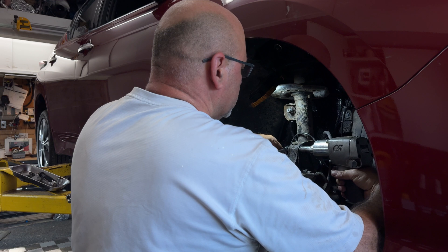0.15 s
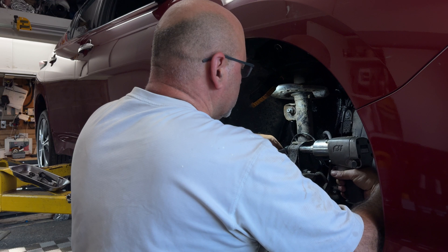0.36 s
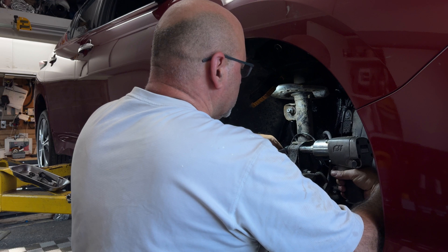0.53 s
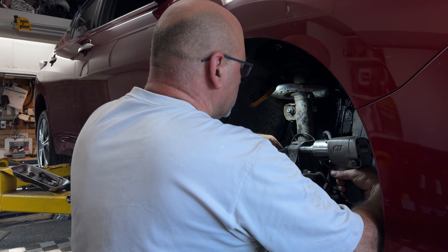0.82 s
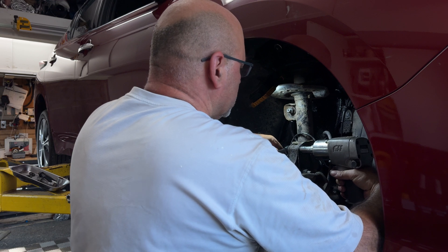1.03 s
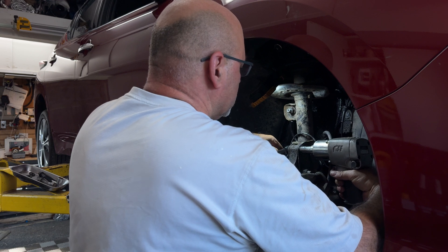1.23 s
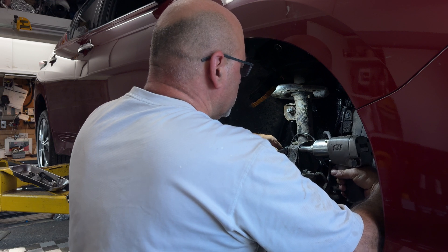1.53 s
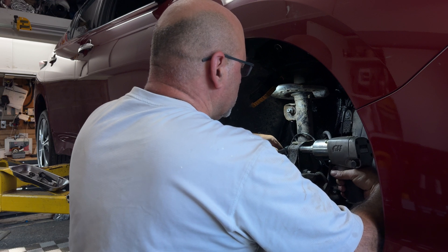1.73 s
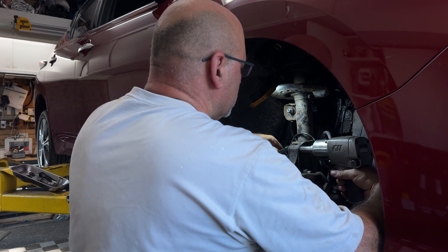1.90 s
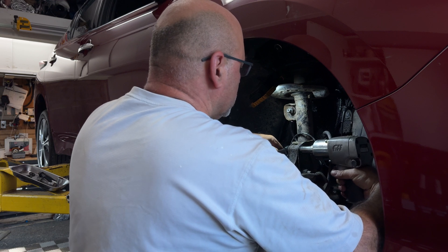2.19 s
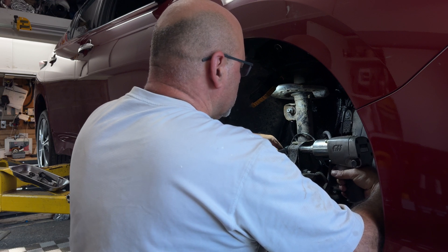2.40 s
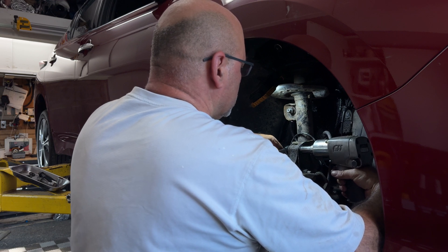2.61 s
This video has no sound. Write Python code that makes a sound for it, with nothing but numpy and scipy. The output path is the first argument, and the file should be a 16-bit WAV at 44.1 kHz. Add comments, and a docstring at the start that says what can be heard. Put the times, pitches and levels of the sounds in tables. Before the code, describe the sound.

A pneumatic impact wrench hammers a suspension nut, heard close. From the start to 1.0 s, steady heavy clanging blows, about eleven per second, with socket clatter, thumping exhaust puffs and air hiss; the motor flutters down. A clink sounds at 1.2 s. A faster, uneven burst runs 1.35-1.95 s, pauses, then a still quicker, brighter one at 2.15-2.67 s. Hollow wheel-arch boom, short garage reverberation, faint background noise.

```python
"""Three short bursts of hard, ringing hammering: a pneumatic impact wrench on a car's suspension nut, in a garage.
In each cycle the air motor gives a thump and quickening exhaust puffs, then stalls as the hammer strikes the anvil.
Between blows the hammer and loose socket clatter; air hisses under each burst, and clinks fall between two.
Blows and contacts are shaped noise plus decaying sines, puffs are filtered pulses. At the microphone the
direct sound comes with near reflections, the boom of the wheel arch, a short room tail and a faint floor."""
import sys
import numpy as np
from scipy import signal
from scipy.io import wavfile
from scipy.ndimage import uniform_filter1d

SR = 44100
rng = np.random.default_rng(int(sys.argv[2]) if len(sys.argv) > 2 else 0)


def store_wav(level_fs):
    """Save 16-bit WAV to argv[1]."""
    pcm = np.round(np.clip(np.atleast_2d(level_fs), -1, 1) * 32767)
    wavfile.write(sys.argv[1], SR, pcm.T.astype(np.int16))


N = 121275

# Event levels are relative to the base level of their layer.
# Hammer blows: (time [s], level [dB], treble [dB], clang pitch [Hz], clang level [dB])
BLOWS = [(.0863,1,-19.5,3270,-8.5), (.18,-1,-21,4310,-13), (0.2727,-4,-14.5,3460,-5),
         (0.3626,1,-16,4280,-12), (0.4532,1,-21.5,3590,-10.5), (.546,-2,-16.5,3260,-12),
         (.637,0.5,-17.5,3600,-13), (.7294,3,-22,4370,-15), (0.8231,0.5,-17,4820,-8),
         (0.9197,1,-17.5,4010,-7.5), (1.0133,2,-21.5,3820,-13), (1.3774,-2.5,-17,3840,-10),
         (1.4124,-4.5,-12.5,4690,-8.5), (1.473,-1.5,-18,4650,-14), (1.5425,-5.5,-10.5,4640,-11.5),
         (1.6254,-2.5,-15.5,3200,-13), (1.706,-5,-8,9700,-12), (1.7883,-4.5,-15.5,5660,-14),
         (1.8707,-5.5,-10,3820,-14), (1.9646,-4.5,-12,2975,-11), (2.1939,-5.5,-11,5250,-11),
         (2.2194,-0.5,-18.5,13930,-13), (2.281,.5,-19.5,3290,-14), (2.3453,-1.5,-16,4150,-19),
         (2.4069,-3,-13,9850,-17), (2.471,-6,-10,13700,-15), (2.5337,-6,-11.5,12630,-13),
         (2.598,-3.5,-11.5,13700,-11), (2.6661,-10,-6.5,13400,-7.5)]
# Clatter of hammer and socket on the rebound: (time [s], level [dB], hold [s])
CLATTERS = [(0.037, -3, 0.016), (.133, 1.5, 0.018), (0.2254, -0.5, 0.02), (0.316, -1, 0.021),
            (0.405, -1.5, 0.021), (0.496, -3.5, 0.019), (0.587, -3.5, 0.014), (0.678, -2, 0.015),
            (.774, 3, 0.017), (0.87, -3, 0.013), (0.963, 2.5, 0.011), (1.069, -10.5, 0.022),
            (1.338, -11.5, 0.021), (1.358, -5, 0.015), (1.444, 2.5, 0.0084), (1.509, 0.5, 0.015),
            (1.586, 0, 0.022), (1.667, -0.5, 0.02), (1.748, -1, 0.021), (1.832, -4, 0.019),
            (1.915, 0.5, 0.016), (2.17, -11, 0.022), (2.249, 2, 0.021), (2.313, -2.5, 0.025),
            (2.376, 4.5, 0.012), (2.442, -1, 0.015), (2.504, 1, 0.016), (2.567, -1.5, 0.019),
            (2.631, 2, 0.013)]
# Motor run-ups, each ending at a blow: (time [s], opening thump level [dB], later puff level [dB])
RUNUPS = [(.039, -2, -3.5), (.134, 4, -2), (0.227, 3, 0), (.316, 0.5, -0.5), (.404, 2, -0.5),
          (.493, 1.5, -1.5), (0.584, 2.5, -3.5), (0.675, 3, -3), (0.765, 5.5, 1), (0.859, 0, -3.5),
          (.963, 3.5, -4.5), (1.3657, 5, 3), (1.442, 5, -0.5), (1.504, 2.5, -2), (1.580, -3.5, 2),
          (1.660, -2, 1.5), (1.752, 3, 2), (1.835, -18, -2.5), (1.915, -3.5, -9), (2.173, 6, 5),
          (2.25, 7, 3), (2.309, -2, 0.5), (2.371, 4.5, 2), (2.438, -1, 1), (2.504, 4, 2.5), (2.567, -1, 2),
          (2.629, 4.5, -3)]
# Heavy gulps of air as the rotor first gives way: (time [s], level [dB])
GULPS = [(1.378, 8.5), (2.1844, 12)]
# Light clinks of the socket on the nut between bursts: (time [s], level [dB])
CLINKS = [(1.1959, 2), (1.2795, -23)]
# Trigger pulls: (start time [s], end time [s], air level [dB])
TRIGGER_PULLS = [(-.03, 1.024, 6), (1.323, 1.929, 8.5), (2.141, 2.668, 8)]
# Ringing modes of socket and suspension arm: (frequency [Hz], relative level [dB])
STEEL_MODES = [(1307,-1.5), (1916,-0.5), (2155,-3.5), (2300,-4), (2966,-4), (3210,2), (3298,2), (3432,-3),
               (4130,2), (4310,-3)]
# Relative spectra of the layers, each: (frequency [Hz], density [dB per Hz])
CRACK_SPECTRUM = [(100, -27), (400, 0.5), (1600, -7), (3000, -5), (3500, 3), (4400, 3.5), (5600, -2),
                  (7400, -1), (8300, -4), (9700, 1), (11500, -3.5), (14600, -3), (15600, -5)]
RING_SPECTRUM = [(100, -13.5), (400, -6.5), (1500, -4), (2500, 4.5), (4300, 0.5), (5800, -0.5), (7000, -11),
                 (8500, -14.5), (10300, -9), (12000, -19), (15500, -12)]
RATTLE_SPECTRUM = [(100, -37.5), (600, -4.5), (1500, -7.5), (2800, 0.5), (4500, 1), (6800, -8.5),
                   (8300, -9.5), (10300, -7), (12500, -11), (15500, -20)]
EXHAUST_SPECTRUM = [(25,-47), (140,-10), (240,2.5), (295,-9), (355,6), (440,-1.5), (600,-16), (950,-5.5),
                    (1400,-29), (4000,-45)]
THUMP_SPECTRUM = [(25,-45), (100,-3.5), (150,4), (240,2.5), (295,-15), (360,2.5), (600,-20), (950,-17),
                  (4000,-33.5)]
CLINK_SPECTRUM = [(100,-24.5), (450,-2.5), (2400,-2.5), (4100,2.5), (6800,-10.5), (15500,-19)]
AIR_SPECTRUM = [(40,-20), (170,4.5), (500,-18), (1300,-2.5), (4300,-6.5), (7500,-13), (14000,-19.5)]
FLOOR_SPECTRUM = [(25,-16), (170,-6.5), (3000,-9), (15000,-30.5)]
# Decay of the garage: (frequency [Hz], time to fall 60 dB [s])
ROOM_DECAY = [(100, 0.79), (260, 0.24), (700, 0.31), (1840, 0.28), (4850, 0.19), (12800, 0.17)]
# Reflections off wheel arch and floor: (delay [s], gain [ratio])
ECHOES = [(.0065, 0.13), (0.0189, 0.053)]

FLOOR_DB, ROOM_DB = -58, -18.5
BOOM_HZ, BOOM_T60_S, BOOM_DB = 164, 0.19, -75  # hollow of the wheel arch
AIR_DB, AIR_RISE_S, AIR_FALL_S = -36.5, 0.04, 0.038
COAST_START_S, COAST_FALL_S, COAST_DB = 0.97, 0.11, -36.5  # run-down at the end of the first burst

CLINK_DB, CLINK_HOLD_S, CLINK_FALL_S, CLINK_STEEL_DB = -20.5, 0.0022, 0.0065, -40.5
CLINK_HZ, CLINK_RING_S, CLINK_RING_DB = 4090, 0.013, -26
CLINK_KNOCK_HZ, CLINK_KNOCK_DB = 762, -25.5

PUFF_COUNT = 7  # the opening thump and six later puffs
MIN_RUN_S = 0.025  # shortest time from run-up to stall
QUICK_RUN_S = 0.034  # run-ups longer than this give deeper puffs
SPIN_LAW = 0.6  # exponent below 1: the puffs quicken
THUMP_DB, PUFF_DB, PUFF_SWELL_DB = 4.5, 0, 1.5
PUFF_JITTER_S, PUFF_NOISE, PUFF_FALL_S = 0.0005, 0.038, 0.004

CLATTER_DB, CLATTER_RISE_S, CLATTER_FALL_S = -14.5, 0.0022, 0.0047
CLATTER_SAG_DB_PER_S, CLATTER_GRAIN_DB, CLATTER_STEEL_DB = -170, 2.5, -34.5
TICKS_PER_S, TICK_DB = 300, 14  # sharp contacts within the clatter

CRACK_DB, CRACK_RISE_S, CRACK_HOLD_S, CRACK_FALL_S = -6, 0.00079, 0.0023, 0.0036
HARD_SHORTENING = 0.21  # dB of crack length lost per dB of extra treble
SNAP_DB = 18  # the first contact stands out of the crack
BOUNCE_DELAY_S, BOUNCE_DB, BOUNCE_HOLD_S = 0.0195, -25.5, 0.0025  # the hammer touches once more
RING_DB, RING_RISE_S, RING_FALL_S = -12, 0.0013, 0.018
GRIT_DB = 2.5  # loose parts chatter while the tool rings
ALIKE = 0.41  # share of noise energy that repeats from blow to blow
KNOCK_HZ, KNOCK_FALL_S, KNOCK_DB, KNOCK_SPREAD = 1106, 0.0038, -14.5, 0.161  # dull part of each blow
CLANG_FALL_S = 0.0056  # a short clang whose pitch changes as the socket turns
STEEL_DB, STEEL_SPREAD_DB, STEEL_T60_S = -27.5, 7, 0.14

CEILING, EDGE_HZ = 0.91, 15850  # full-scale ratio, top of the band


def amp(db):
    """Converts decibels to gain."""
    return 10 ** (np.asarray(db) / 20)


def read(points, hz):
    """Interpolates a table along a log-frequency axis."""
    f, value = np.transpose(points)
    return np.interp(np.log(hz + 1), np.log(f + 1), value)


def add(mix, s, sound):
    """Mixes a sound in at a time in seconds."""
    part = mix[max(round(s * SR), 0):][:len(sound)]
    part += sound[:len(part)]


def colour(x, spectrum, size=4096):
    """Filters with a causal, minimum-phase response of unit energy and the given spectrum."""
    hz = abs(np.fft.fftfreq(size, 1 / SR))
    log_gain = np.log(amp(read(spectrum, hz)))
    response = np.exp(np.conj(signal.hilbert(log_gain)))
    taps = np.fft.ifft(response).real[:size // 2]
    return signal.fftconvolve(x, taps / np.linalg.norm(taps))[:N]


def envelope(t, rise, hold, fall):
    """Rises in a straight line, holds, then falls exponentially."""
    return np.clip(t / rise, 0, 1) * np.exp(-np.maximum(t - rise - hold, 0) / fall)


def ages(size=8192):
    """Gives the seconds since the start of one event."""
    return np.arange(size) / SR


def ping(hz, fall):
    """One quickly dying mode: a sine under a decay."""
    t = ages()
    return np.sin(2 * np.pi * hz * t) * envelope(t, CRACK_RISE_S, 0, fall)


def grit(count, depth_db):
    """A gain of unit power that jumps about as if from one tiny contact to the next."""
    lumps = uniform_filter1d(rng.standard_normal(count), size=70)
    gain = amp(depth_db * lumps / lumps.std())
    return gain / np.sqrt(np.mean(gain ** 2))


def steel():
    """One ring of the steel: decaying modes, their strengths drawn anew for where the socket sits."""
    t = ages()
    hz, db = np.transpose(STEEL_MODES)[:, :, None]
    db = db + STEEL_SPREAD_DB * rng.uniform(-0.93, 1, hz.shape)
    decay = amp(db - 60 * t / STEEL_T60_S)
    waves = np.sin(2 * np.pi * (hz * t + rng.random(hz.shape)))
    return (decay * waves).sum(0) * np.minimum(t / CRACK_RISE_S, 1)


def background():
    """The faint floor of the place: steady coloured noise."""
    return amp(FLOOR_DB) * colour(rng.standard_normal(N), FLOOR_SPECTRUM)


def garage(x):
    """Direct sound, near reflections, the boom of the wheel arch and a short diffuse tail."""
    hz, t, noise = signal.stft(rng.standard_normal(SR // 2), SR, nperseg=256)
    decay = amp(-60 * t / read(ROOM_DECAY, hz)[:, None])
    build_up = np.minimum(t / 0.015, 1)
    tail = signal.istft(noise * decay * build_up, SR, nperseg=256)[1]
    age = ages(size=len(tail))
    boom = amp(BOOM_DB - 60 * age / BOOM_T60_S) * np.cos(2 * np.pi * BOOM_HZ * age)
    response = amp(ROOM_DB) * tail / np.linalg.norm(tail) + boom
    out = x + signal.fftconvolve(x, response)[:N]
    for delay, gain in ECHOES:
        add(out, delay, gain * x)
    return out


def air():
    """Compressed air hisses through the tool while the trigger is held: gated turbulent noise."""
    t = np.arange(N) / SR
    flow = np.zeros(N)
    for start, end, db in TRIGGER_PULLS:
        hold = end - start - AIR_RISE_S
        flow += amp(db + AIR_DB) * envelope(t - start, AIR_RISE_S, hold, AIR_FALL_S)
    return colour(flow * rng.standard_normal(N), AIR_SPECTRUM)


def coast():
    """A low rush of air dies away as the rotor spins down freely."""
    t = np.arange(N) / SR - COAST_START_S
    level = amp(COAST_DB) * envelope(t, AIR_RISE_S, 0, COAST_FALL_S)
    return colour(level * rng.standard_normal(N), THUMP_SPECTRUM)


def clinks():
    """The socket shifts on the nut while the tool rests: brief noise, steel modes and two pings."""
    t = ages()
    contacts, modes = np.zeros((2, N))
    shape = envelope(t, CLATTER_RISE_S, CLINK_HOLD_S, CLINK_FALL_S)
    for s, db in CLINKS:
        add(contacts, s, amp(db + CLINK_DB) * shape * rng.standard_normal(len(t)))
        add(modes, s, amp(db + CLINK_STEEL_DB) * steel())
        add(modes, s, amp(db + CLINK_RING_DB) * ping(CLINK_HZ, CLINK_RING_S))
        add(modes, s, amp(db + CLINK_KNOCK_DB) * ping(CLINK_KNOCK_HZ, KNOCK_FALL_S))
    return colour(contacts, CLINK_SPECTRUM) + modes


def motor():
    """The rotor breaks free with a deep thump of air; puffs then quicken until the blow stalls it."""
    t = ages(size=1024)
    thumps, puffs = np.zeros((2, N))
    for start, thump_db, puff_db in RUNUPS:
        stall = min(blow[0] for blow in BLOWS if blow[0] > start + MIN_RUN_S)
        run = stall - start
        quick = min(QUICK_RUN_S / run, 1)
        # Each puff is one sharp pulse with a short noisy tail.
        noise = rng.standard_normal((PUFF_COUNT, len(t)))
        shapes = (t == 0) + PUFF_NOISE * np.exp(-t / PUFF_FALL_S) * noise
        add(thumps, start, -amp(thump_db + THUMP_DB) * shapes[0])
        for k in range(1, PUFF_COUNT):
            turn = k / PUFF_COUNT
            s = start + run * turn ** SPIN_LAW + PUFF_JITTER_S * rng.standard_normal()
            puff = -amp(puff_db + PUFF_DB + PUFF_SWELL_DB * turn) * shapes[k]
            add(puffs, s, quick * puff)
            add(thumps, s, (1 - quick) * puff)
    for s, db in GULPS:
        add(puffs, s, -amp([db]))
    return colour(thumps, THUMP_SPECTRUM) + colour(puffs, EXHAUST_SPECTRUM)


def clatter():
    """Small uneven contacts as the hammer rides over its cam: gritty noise, ticks and steel modes."""
    t = ages()
    contacts, modes = np.zeros((2, N))
    for s, db, hold in CLATTERS:
        sagging = amp(db + CLATTER_DB + CLATTER_SAG_DB_PER_S * t)
        level = sagging * grit(len(t), CLATTER_GRAIN_DB)
        ticks = amp(TICK_DB) * (rng.random(len(t)) < TICKS_PER_S / SR)
        grain = rng.standard_normal(len(t)) + ticks
        add(contacts, s, level * envelope(t, CLATTER_RISE_S, hold, CLATTER_FALL_S) * grain)
        add(modes, s, amp(db + CLATTER_STEEL_DB) * steel())
    return colour(contacts, RATTLE_SPECTRUM) + modes


def hammer():
    """Each blow: dull knock, bright crack and bounce, socket clang, dense tool ring and steel modes."""
    t = ages()
    crack, ring, modes = np.zeros((3, N))
    same = rng.standard_normal((2, len(t)))
    usual_treble = np.mean([blow[2] for blow in BLOWS])
    for s, db, treble_db, clang_hz, clang_db in BLOWS:
        fresh = rng.standard_normal(same.shape)
        crack_noise, ring_noise = np.sqrt(ALIKE) * same + np.sqrt(1 - ALIKE) * fresh

        # A brighter blow has a louder, shorter crack.
        hard_db = treble_db - usual_treble
        length = amp(-HARD_SHORTENING * hard_db)
        crack_db = db + CRACK_DB + hard_db
        shape = envelope(t, CRACK_RISE_S, CRACK_HOLD_S * length, CRACK_FALL_S * length)
        add(crack, s, amp(crack_db) * crack_noise * shape)
        add(crack, s + CRACK_RISE_S, amp([crack_db + SNAP_DB]))
        bounce = rng.standard_normal(len(t)) * envelope(t, CLATTER_RISE_S, BOUNCE_HOLD_S, CRACK_FALL_S)
        add(crack, s + BOUNCE_DELAY_S, amp(BOUNCE_DB) * bounce)

        chatter = ring_noise * grit(len(t), GRIT_DB)
        add(ring, s, amp(db + RING_DB) * chatter * envelope(t, RING_RISE_S, 0, RING_FALL_S))

        knock_hz = KNOCK_HZ * (1 + KNOCK_SPREAD * rng.standard_normal())
        add(modes, s, amp(db + STEEL_DB) * steel())
        add(modes, s, amp(KNOCK_DB) * ping(knock_hz, KNOCK_FALL_S))
        add(modes, s, amp(clang_db) * ping(clang_hz, CLANG_FALL_S))
    return colour(crack, CRACK_SPECTRUM) + colour(ring, RING_SPECTRUM) + modes


def scene():
    """The wrench in the garage, over the faint background."""
    wrench = air() + coast() + clinks() + motor() + clatter() + hammer()
    return (garage(wrench) + background())[None]


def record(dry):
    """Rounds off the loudest peaks at the microphone, then limits the band."""
    rounded = CEILING * np.tanh(dry / CEILING)
    low_pass = signal.firwin(255, EDGE_HZ, window=("kaiser", 9), fs=SR)
    return signal.oaconvolve(rounded, low_pass[None], "same")


dry = scene()
out = record(dry)
store_wav(out)
```